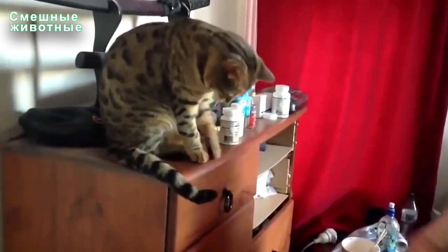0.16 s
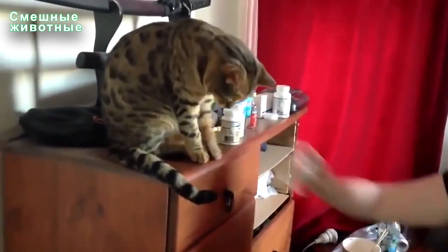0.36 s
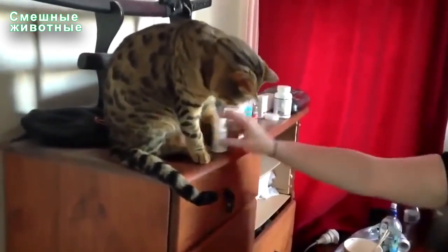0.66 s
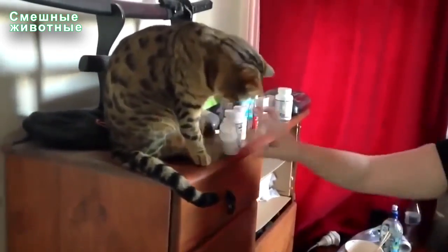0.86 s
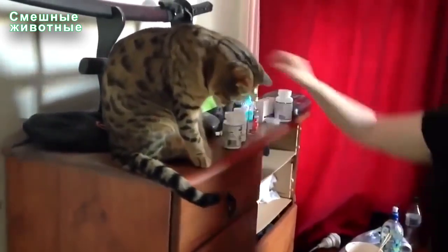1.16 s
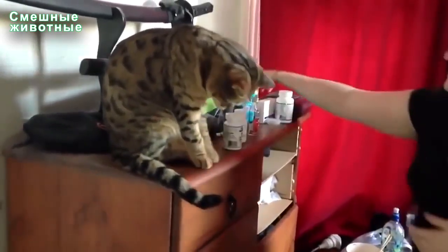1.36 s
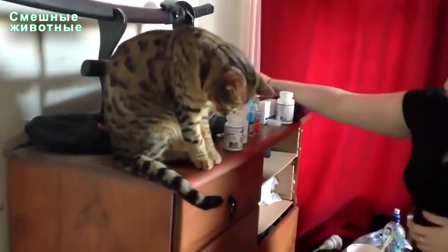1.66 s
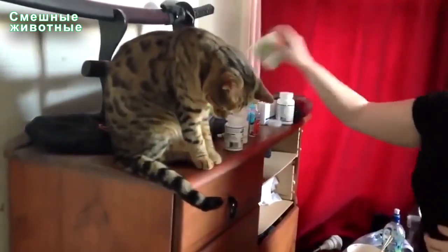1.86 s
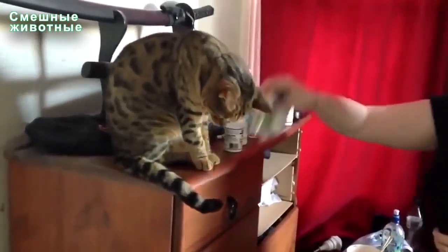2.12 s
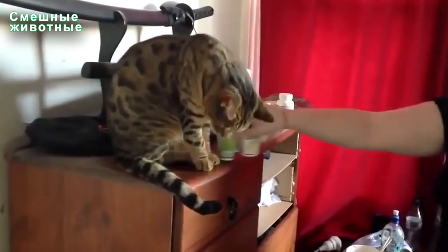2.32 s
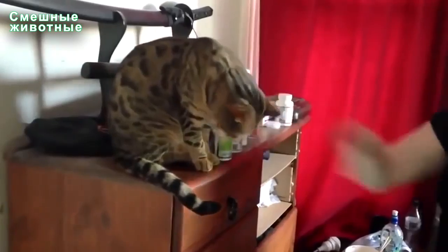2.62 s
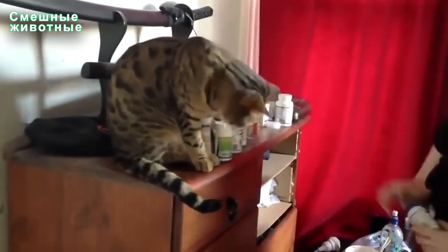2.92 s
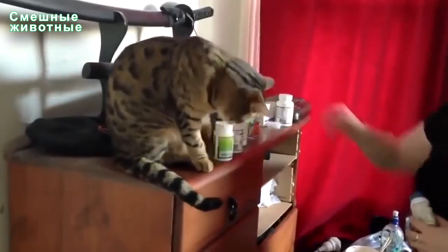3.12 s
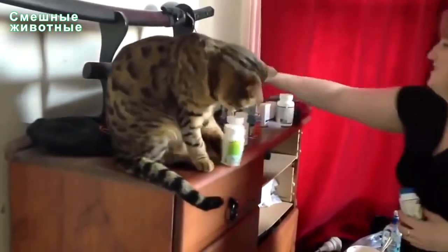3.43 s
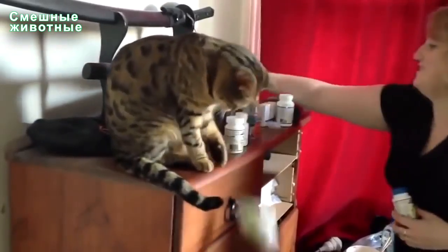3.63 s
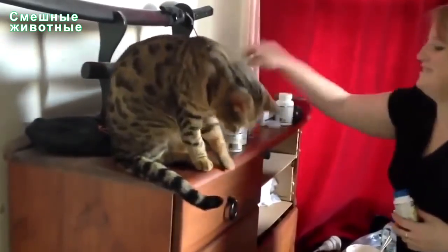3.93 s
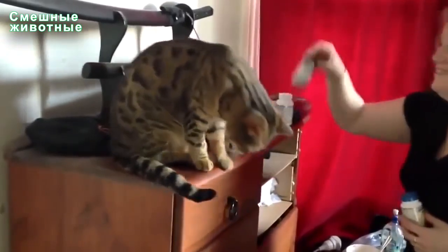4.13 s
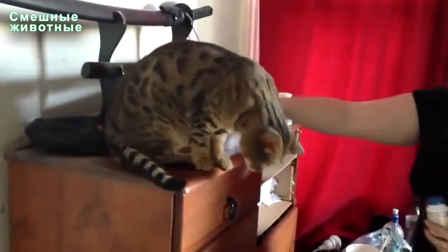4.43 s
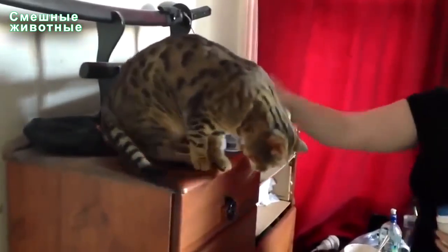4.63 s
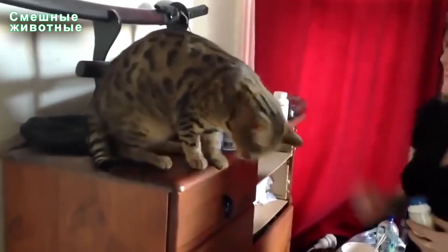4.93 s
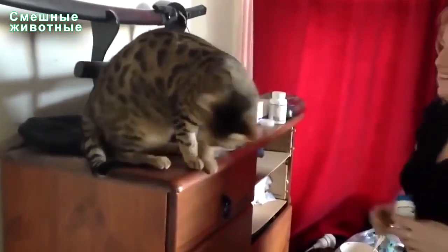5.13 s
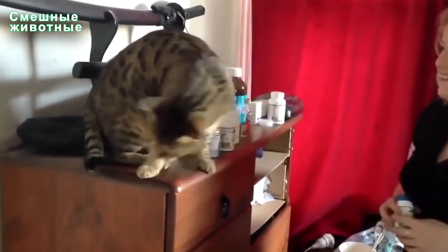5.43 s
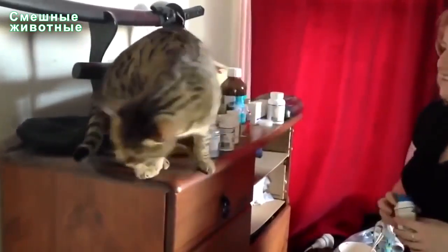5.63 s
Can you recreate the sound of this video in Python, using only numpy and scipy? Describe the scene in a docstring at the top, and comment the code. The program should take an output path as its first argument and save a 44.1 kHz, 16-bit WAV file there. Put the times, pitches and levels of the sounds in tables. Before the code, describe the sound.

Plastic pill bottles clack sharply on a wooden dresser in uneven clusters, loose pills rattling inside, with low thuds and quiet pauses in a small room.

```python
"""A small room, at a wooden dresser: a cat paws plastic pill bottles off the top, a hand catches and returns them.
Bottles clack on wood and on each other as ringing walls with bright cracks; loose pills tap the walls singly
and in showers. Bottles thud down below on damped wood modes, and the top booms briefly under weight.
Fur and skin rustle as grainy noise, light touches leave thin ringing modes, and the room adds a short tail
over faint air and microphone hiss."""
import sys
import numpy as np
from scipy import signal
from scipy.fft import rfft, irfft, next_fast_len
from scipy.io import wavfile
from scipy.ndimage import uniform_filter1d

SR = 44100
rng = np.random.default_rng(int(sys.argv[2]) if len(sys.argv) > 2 else 0)


def to_wav(s):
    """Save 16-bit WAV."""
    ch = np.atleast_2d(s).T  # columns
    pcm = np.round(np.clip(ch, -1, 1) * 32767)  # PCM
    wavfile.write(sys.argv[1], SR, pcm.astype(np.int16))


N = 254456

# Event levels are before the layer trims in the functions; spectrum and mode levels are relative.
# Room air and microphone hiss: (frequency [Hz], level [dB])
HISS_SPECTRUM = [(25, 4.5), (60, -20), (90, -22), (120, 1), (160, -6), (220, -0.5), (400, -4), (700, -9.5),
                 (1100, -10.5), (1600, -13), (4000, -13), (8000, -15.5), (15000, -19.5)]
# Room tail by band: (frequency [Hz], decay t60 [s], level [dB])
ROOM_BANDS = [(99.5, 0.62, -4), (402, 0.33, 1.5), (1018, 0.32, 3), (1737, 0.21, 5), (2970, 0.23, 3.5),
              (4740, 0.26, 4), (14000, 0.2, 3.5)]
# Strokes of fur, skin and sliding bottles: (middle time [s], half length [s], level [dB], resonance [Hz])
RUB_STROKES = [(.055, 0.024, -56, 453), (1.13, 0.11, -65.5, 305), (1.386, 0.082, -55.5, 186),
               (1.72, 0.11, -54.5, 264), (2.94, 0.32, -65.5, 1920), (3.123, 0.0087, -54, 345),
               (3.599, 0.042, -54, 430), (3.711, 0.012, -50.5, 170), (5.169, 0.11, -67, 1496),
               (5.55, 0.053, -72, 1490)]
# Friction of fur and skin: (frequency [Hz], level [dB])
FUR_SPECTRUM = [(30, -44), (70, -31.5), (100, -24), (140, 2), (450, -1.5), (700, -2), (2000, -4.5),
                (5000, -12), (9000, -17.5), (15000, -27.5)]
# A bottle or paw puts weight on the dresser top: (time [s], peak level [dB], pitch [Hz])
TOP_BUMPS = [(0.647, -28, 182.2), (0.827, -25.5, 264.4), (.83, -28, 392), (1.492, -46, 177),
             (1.923, -47, 770), (2.176, -31, 188.7), (2.468, -29.5, 470), (3.713, -48, 174),
             (4.0195, -25.5, 605), (4.021, -27.5, 236), (4.446, -56.5, 400), (4.581, -34, 243),
             (4.637, -29, 287), (4.755, -39.5, 260), (4.829, -33, 185), (5.368, -50.5, 315),
             (5.595, -58.5, 320), (5.749, -44, 267.5)]
# A falling bottle lands low on furniture or floor: (time [s], level [dB], upper modes [dB])
LOW_THUDS = [(.824, -16.5, -11), (1.486, -28, -14), (1.698, -30.5, -9.5), (1.824, -37, 1.5),
             (2.467, -20, -12), (4.635, -17.5, -6)]
# Rim, side and one rebound of each landing: (delay [s], level [dB])
LANDING_BOUNCES = [(0, 1.5), (.0095, -3.5), (.058, -10.5)]
# Modes of the wood landed on: (frequency [Hz], level [dB], decay t60 [s])
WOOD_MODES = [(282.5, -10, 0.54), (358, -12, 0.055), (405.4, 2, 0.12), (520, -3, 0.055), (534, -1, 0.016),
              (744, -6.5, .05), (790, 6.5, 0.034), (880, -22.5, .04), (1070, 1, 0.054), (1220, -2.5, 0.14)]
# Hollow bottle body and dull clatter: (frequency [Hz], level [dB])
BODY_SPECTRUM = [(30, -10.5), (80, -22), (130, -15), (200, -1.5), (400, 0.5), (550, -5), (750, -3.5),
                 (1000, -7), (1350, -9.5), (2200, -15), (5000, -46.5)]
# Glancing touches, and one pill's high ring at .617 s: (time [s], level [dB], main mode [Hz], second mode [Hz],
# tick level [dB])
GLANCING_CLINKS = [(.617, -24.5, 1870, 3630, -32), (3.947, -48.5, 2270, 4175, 2),
                   (4.233, -43, 2350, 5460, 6), (4.2826, -39, 2280, 5580, 16), (4.296, -41, 2360, 2434, -6),
                   (4.339, -39.5, 1690, 2780, 8), (4.4, -38, 4185, 2180, 8), (4.523, -40, 2086, 2410, 4),
                   (4.562, -48, 2114, 4500, 2), (4.595, -32, 2670, 2920, -17),
                   (4.636, -34.5, 2820, 4470, -6), (4.765, -25, 1723, 1737, -18),
                   (4.862, -30.5, 1734, 1810, -5)]
# Snap and crackle of hard plastic: (frequency [Hz], level [dB])
CRACK_SPECTRUM = [(200, -15.5), (1000, -9.5), (1800, -1.5), (2900, 3.5), (3900, -3.5), (5100, -3),
                  (6000, -8.5), (8000, -12), (10000, -18), (12000, -24.5), (15500, -35)]
# Modes of a bottle wall left free: (multiple of its pitch [ratio], level [dB], decay t60 [s])
WALL_MODES = [(1, 5.5, 0.028), (1.14, -15, 0.011), (.86, 0.5, 0.01), (1.33, -25.5, 0.017),
              (1.56, -13, 0.036), (1.77, -16, 0.024), (2.75, -21.5, 0.017)]
# Single pills dropping hard on the wall: (time [s], level [dB], wall pitch [Hz])
SINGLE_PILLS = [(0.2135, -38.5, 1740), (.2286, -39, 1760), (.3488, -37, 2010), (0.382, -43, 2170),
                (.617, -16, 1800), (0.7588, -23, 1760), (0.7725, -22.5, 1700), (0.782, -22, 1780),
                (0.8871, -15.5, 1774), (.9203, -17.5, 1740), (0.9527, -21.5, 1744), (1.01, -27.5, 1743),
                (2.081, -47, 1840), (2.2163, -16, 1660), (2.245, -20, 1630), (2.2552, -18.5, 1645),
                (2.3041, -10, 1738), (2.5266, -20.5, 1710), (2.5728, -26, 1586), (2.835, -36.5, 1650),
                (2.937, -34, 1760), (2.9532, -30, 1890), (2.9889, -32, 1830), (3.0277, -33, 1840),
                (3.2193, -43, 1850), (3.27, -38.5, 1873), (4.8607, -17.5, 1730), (4.885, -21.5, 1680),
                (4.9358, -23.5, 1706), (5.052, -40, 2710), (5.1025, -34, 2650), (5.1483, -37, 1840)]
# Jolts that keep loose pills tumbling: (time [s], level [dB], hold [s], wall pitch [Hz])
PILL_RATTLES = [(0.218, -58, 0.14, 1900), (0.515, -24.5, .015, 2200), (.576, -23.5, .09, 1895),
                (0.756, -25.5, 0.16, 1843), (1.638, -41.5, 0.059, 2200), (1.96, -61.5, 0.45, 1910),
                (2.153, -26, 0.024, 1930), (2.218, -32.5, 0.093, 1680), (2.53, -35.5, 0.048, 1735),
                (2.841, -44.5, 0.2, 1820), (4.023, -22.5, 0.025, 1780), (4.25, -44.5, 0.58, 2300),
                (4.585, -17, 0.0076, 1780), (4.763, -15.5, .015, 1820), (4.84, -22, 0.023, 1750),
                (5.049, -53.5, 0.11, 1650)]
# Bottle on wood or bottle, and one bright pill tick at .2866 s: (time [s], level [dB], wall pitch [Hz], treble
# [dB], hollow body [dB])
BOTTLE_KNOCKS = [(.2866, -58.5, 3400, 0, -30), (0.5152, -18, 1760, -16.5, -23.5),
                 (.571, -8, 1780, -19.5, -53), (.645, -9, 2300, -14, -38),
                 (0.6637, -12.5, 2730, -33.5, -40), (0.6688, -10, 2075, -43, -45),
                 (.823, -21, 1980, -10, -10.5), (0.8511, -20.5, 2760, -20, -24),
                 (0.8811, -19.5, 1830, -27, -23), (0.931, -20.5, 2100, -18.5, -27),
                 (1.042, -22, 2043, -25, -35.5), (1.4641, -19.5, 3040, -13.5, -17),
                 (1.487, -11.5, 1960, -24.5, -16), (1.625, -29.5, 1990, -12, -14),
                 (1.9226, -36.5, 2580, -30, -14.5), (2.172, -19, 1870, -17.5, -26),
                 (2.1776, -10, 2062, -21, -35), (2.4656, -23.5, 1900, -18.5, -11.5),
                 (2.7595, -39, 4120, -16, -37), (2.995, -28, 3140, -15, -28),
                 (4.0181, -21, 1910, -22.5, -13.5), (4.0238, -17, 2850, -9.5, -16.5),
                 (4.0295, -4, 2675, -19.5, -35), (4.042, -2, 2866, -26.5, -35),
                 (4.0458, -9.5, 3110, -27, -31.5), (4.581, -11, 1907, -27, -28),
                 (4.6337, -18.5, 1540, -23, -15.5), (4.7559, -14.5, 1730, -13, -22),
                 (4.7634, -6.5, 1770, -24.5, -49), (4.7781, -8.5, 2850, -24.5, -36),
                 (4.8275, -15, 1900, -21.5, -26)]

T = np.arange(SR // 4) / SR  # time since a blow [s]
EDGE_HZ = 15500  # upper band limit
HISS_DB = -65.5  # rms
RUB_DB = 0  # rubbed resonance against the friction hiss
BUMP_CYCLES = 14.9  # swings until the wood has died by 60 dB
CLINK_CYCLES = 350  # swings until the rough part of a mode has died by 60 dB; the pure part takes half
CLINK_SECOND_DB = -3.5  # second mode against the main one
KNOCK_DAMPING, PILL_DAMPING = 1.32, 1.12  # factors by which the touched wall dies faster
TICK_DB, TICK_SLOPE = -19.5, 0.65  # tick at 0 dB ring before trim; dB lost per dB of ring: light taps are mostly tick
STIR_S, STIR_DB = .01, 21.5  # pills start to slide this long before the jolt, this much softer
SETTLE_DB_PER_S, SETTLE_S = 194.5, 0.19  # after the hold the pills come to rest


def amp(db):
    """Decibels to gain."""
    return 10 ** (np.asarray(db) / 20)


def unit_rms(x):
    """Scales to rms 1."""
    return x / np.sqrt(np.mean(x ** 2) + 1e-20)


def unit_peak(x):
    """Scales to peak 1."""
    return x / (abs(x).max() + 1e-20)


def read(points, hz):
    """Reads a table on a log-frequency axis."""
    f, value = np.transpose(points)
    return np.interp(np.log(hz + 1), np.log(f + 1), value)


def add(mix, s, sound):
    """Mixes a sound in at time s."""
    part = mix[max(round(s * SR), 0):][:len(sound)]
    part += sound[:len(part)]


def colour(x, points, size=2048):
    """Causal minimum-phase filter with the given spectrum."""
    log_gain = np.log(amp(read(points, abs(np.fft.fftfreq(size, 1 / SR)))))
    taps = np.fft.ifft(np.exp(np.conj(signal.hilbert(log_gain)))).real
    return signal.fftconvolve(x, taps[:size // 2])[:len(x)]


def fade(t60):
    """Exponential decay after a blow."""
    return np.exp(-np.log(1000) * T / max(t60, 1e-3))


def ring(hz, t60):
    """One damped mode."""
    return np.sin(2 * np.pi * hz * T) * fade(t60)


def fuzz(hz, width, size):
    """Noise in a narrow resonance."""
    f = np.fft.rfftfreq(size, 1 / SR)
    resonance = 1 + ((f - hz) / width) ** 2
    return unit_rms(irfft(rfft(rng.standard_normal(size)) / resonance, size))


def burst(points, t60):
    """Many close, quickly damped modes: a coloured, dying puff."""
    puff = rng.choice([-1., 1.], len(T)) * fade(t60)
    return unit_peak(colour(puff, points))


def soften(x, rise):
    """A contact that takes some time to build."""
    return x * (1 - np.exp(-T / max(rise, 1e-5)))


def background():
    """Quiet room air and microphone hiss: steady noise with a fixed spectrum."""
    hz = np.fft.rfftfreq(N, 1 / SR)
    spectrum = rfft(rng.standard_normal(N)) * amp(read(HISS_SPECTRUM, hz))
    return amp(HISS_DB) * unit_rms(irfft(spectrum, N))


def room(x, gap=0.0059):
    """Reflections from near walls, dense after a short gap, each band dying at its own speed."""
    t = np.arange(SR // 2) / SR
    taps = rng.choice([-1., 1.], len(t)) * (rng.random(len(t)) < .1) * (t > gap)
    hz, age, bands = signal.stft(taps, SR, nperseg=256)
    t60, db = (read(np.array(ROOM_BANDS)[:, [0, k]], hz)[:, None] for k in (1, 2))
    decay = np.exp(-np.log(1000) * age / t60)
    tail = signal.istft(bands * amp(db) * decay, SR, nperseg=256)[1]
    return signal.fftconvolve(x, tail / np.linalg.norm(tail))[:N]


def rustles(grain_db=4, level_db=-3, width_hz=40, width_share=0.02):
    """Grainy friction swells and fades with each stroke and excites one resonance of the rubbed thing."""
    t = np.arange(N) / SR
    grain = amp(grain_db * unit_rms(uniform_filter1d(rng.standard_normal(N), size=120)))
    hiss = unit_rms(colour(grain * rng.standard_normal(N), FUR_SPECTRUM))
    out = np.zeros(N)
    for s, half, db, hz in RUB_STROKES:
        tone = unit_rms(grain) * fuzz(hz, width_hz + width_share * hz, next_fast_len(N))[:N]
        stroke = np.exp(-.5 * ((t - s) / half) ** 2)
        out += stroke * amp(db) * (hiss + amp(RUB_DB) * tone)
    return amp(level_db) * out


def bumps():
    """Soft loads make the wooden top boom briefly: one slowly built, damped mode each."""
    out = np.zeros(N)
    for s, db, hz in TOP_BUMPS:
        boom = soften(ring(hz, BUMP_CYCLES / hz), rise=0.0088)
        add(out, s, amp(db) * unit_peak(boom))
    return out


def thuds(level_db=-5.0, upper_db=8, split_hz=600, clatter_db=-2, clatter_s=0.094):
    """A landing bottle drives the wood modes, differently at each spot, under a short dull clatter."""
    out = np.zeros(N)
    for s, db, upper in LOW_THUDS:
        for delay, bounce_db in LANDING_BOUNCES:
            spot = rng.uniform(-0.83, 1, len(WOOD_MODES))  # only its sign counts
            shift = 1 + .04 * rng.uniform(-1, 1, len(WOOD_MODES))
            modes = 0
            for (hz, mode_db, t60), side, k in zip(WOOD_MODES, spot, shift):
                gain = amp(mode_db + (upper + upper_db) * (hz > split_hz))
                modes = modes + np.sign(side) * gain * ring(hz * k, t60)
            landing = unit_peak(modes) + amp(clatter_db) * burst(BODY_SPECTRUM, clatter_s)
            add(out, s + delay, amp(db + bounce_db + level_db) * soften(landing, rise=0.00097))
    return out


def clinks(fuzz_hz=130, fuzz_db=-4):
    """A light tick with two longer-lived modes, made rough by the loose contact."""
    def rough_mode(hz):
        """A pure damped mode plus narrow noise that dies half as fast."""
        pure = ring(hz, CLINK_CYCLES / hz / 2)
        return pure + amp(fuzz_db) * fuzz(hz, fuzz_hz, len(T)) * fade(CLINK_CYCLES / hz)

    out = np.zeros(N)
    for s, db, main_hz, second_hz, tick_db in GLANCING_CLINKS:
        main = rough_mode(main_hz)
        second = rough_mode(second_hz)
        tick = amp(tick_db) * burst(CRACK_SPECTRUM, t60=0.0198)
        add(out, s, amp(db) * (main + amp(CLINK_SECOND_DB) * second + tick))
    return out


def wall(hz, damping, others_db=0, scatter_db=5.0, detune=0.0088):
    """The bottle wall rings; each point of contact favours other modes."""
    chance = rng.standard_normal((len(WALL_MODES), 2))
    chance[0] = 0  # the main mode stays put
    shell = 0
    for k, ((ratio, db, t60), (louder, sharper)) in enumerate(zip(WALL_MODES, chance)):
        gain = amp(db + scatter_db * louder + others_db * (k > 0))
        shell = shell + gain * ring(hz * ratio * (1 + detune * sharper), t60 / damping)
    return unit_peak(shell)


def pill(db, hz, tick_db):
    """A pill taps the wall: a tick and a short ring, with the upper modes held back a little."""
    tick = amp(TICK_DB + TICK_SLOPE * db + tick_db) * burst(CRACK_SPECTRUM, t60=0.019)
    return soften(amp(db) * wall(hz, PILL_DAMPING, others_db=-1.5) + tick, rise=0.00036)


def pills(level_db=0, tick_db=-3):
    """The pills that stand out singly, each one tap on the wall."""
    out = np.zeros(N)
    for s, db, hz in SINGLE_PILLS:
        add(out, s, pill(db + level_db, hz, tick_db))
    return out


def tumbles(per_s=160, spread=0.036, uneven_db=4, level_db=-1.1, edge_db=1.5, hard_db=3):
    """Showers of pills at uneven moments, dying down as they settle; edge-first landings tick more."""
    out = np.zeros(N)
    for start, db, hold, hz in PILL_RATTLES:
        chance = rng.standard_normal((160, 3))
        # twelve different taps, used in turn
        taps = [pill(db + level_db, hz * np.exp(spread * z), edge_db + hard_db * np.tanh(edge))
                for z, edge in rng.standard_normal((12, 2))]
        count = int((hold + SETTLE_S) * per_s)
        for k, (late, size, side) in enumerate(chance[:count]):
            age = (k + .5 + .5 * np.tanh(late)) / per_s - STIR_S
            stirring = STIR_DB * max(-age / STIR_S, 0) ** .5
            settling = SETTLE_DB_PER_S * max(age - hold, 0)
            gain = np.sign(side) * amp(uneven_db * np.tanh(size) - (stirring + settling))
            add(out, start + age, gain * taps[k % len(taps)])
    return out


def knocks(wall_db=0, crack_db=12, snap_db=10, body_db=11, again_db=-8, again_s=0.0032):
    """Hard contacts: the wall rings twice as the bottle rocks, the rim snaps and crackles, the hollow pocks."""
    shells, cracks = np.zeros((2, N))
    for s, db, hz, treble, hollow in BOTTLE_KNOCKS:
        first = soften(wall(hz, KNOCK_DAMPING), rise=0.0001)
        add(shells, s, amp(db + wall_db) * first)
        again = s + again_s * rng.uniform(0.858, 0.92)
        second = soften(wall(hz, KNOCK_DAMPING, detune=0.1), rise=0.00039)
        add(shells, again, amp(db + wall_db + again_db) * second)
        crackle = amp(crack_db) * soften(burst(CRACK_SPECTRUM, t60=0.037), rise=0.00016)
        snap = amp(snap_db) * burst(CRACK_SPECTRUM, t60=0.002)
        body = amp(body_db + hollow) * soften(burst(BODY_SPECTRUM, t60=0.051), rise=0.0002)
        add(cracks, s, amp(db) * (amp(treble) * (crackle + snap) + body))
    return shells, cracks


def radiate(x, edge_hz=1450):
    """The small wall gives off little below the edge frequency."""
    return signal.sosfilt(signal.butter(5, edge_hz, "high", fs=SR, output="sos"), x)


def scene(ring_wet_db=-10, crack_wet_db=-4, pill_wet_db=-8, low_wet_db=-5, bump_wet_db=-11):
    """Every layer reaches the microphone directly and, at its own wet level, through the room."""
    shells, cracks = knocks()
    layers = [(radiate(shells + clinks()), ring_wet_db),
              (cracks + rustles(), crack_wet_db),
              (radiate(pills() + tumbles()), pill_wet_db),
              (thuds(), low_wet_db),
              (bumps(), bump_wet_db)]
    direct = sum(x for x, wet in layers)
    reflected = sum(room(amp(wet) * x) for x, wet in layers)
    return (direct + reflected + background())[None]


def record(dry):
    """The small microphone loses the deep bass; then the band limit."""
    thin = signal.sosfilt(signal.butter(2, 75, "high", fs=SR, output="sos"), dry)
    band_limit = signal.firwin(255, EDGE_HZ, window=("kaiser", 8), fs=SR)
    return signal.oaconvolve(thin, band_limit[None], "same")


dry = scene()
out = record(dry)
to_wav(out)
```